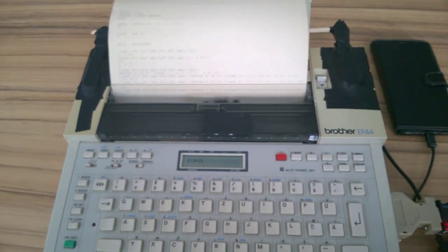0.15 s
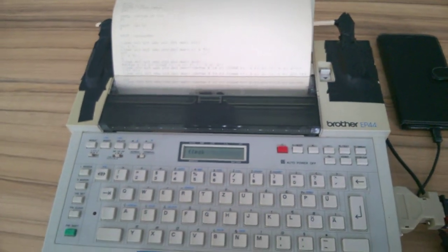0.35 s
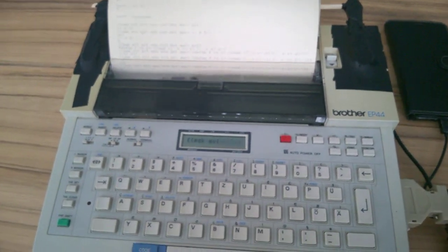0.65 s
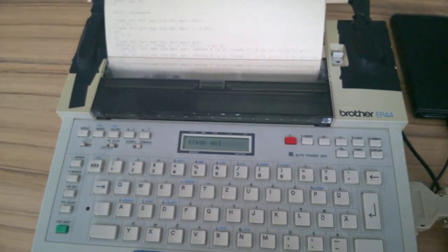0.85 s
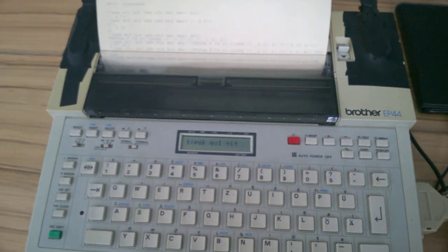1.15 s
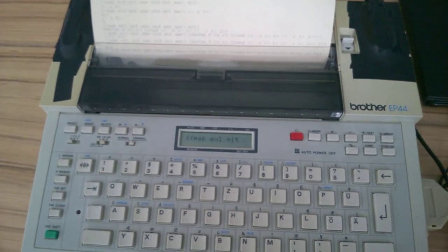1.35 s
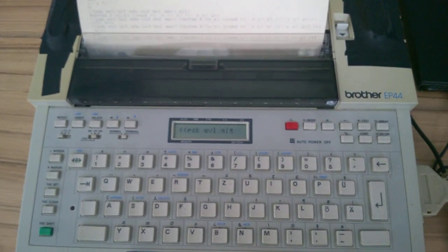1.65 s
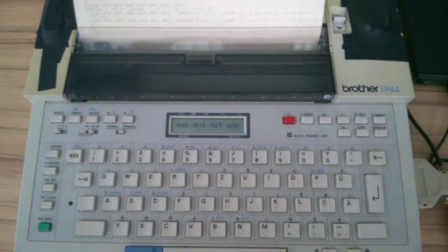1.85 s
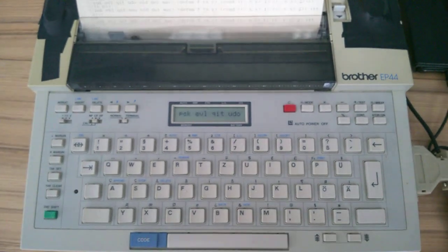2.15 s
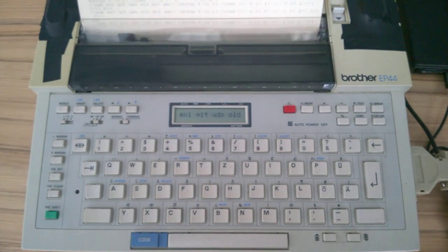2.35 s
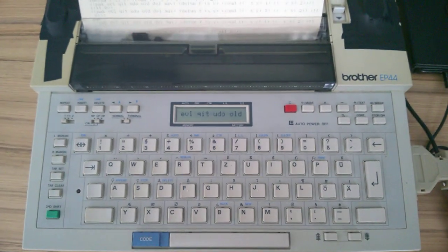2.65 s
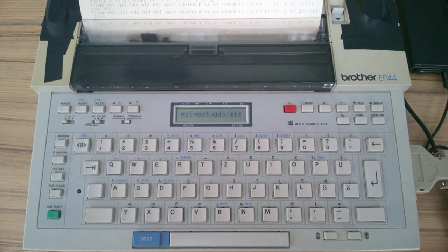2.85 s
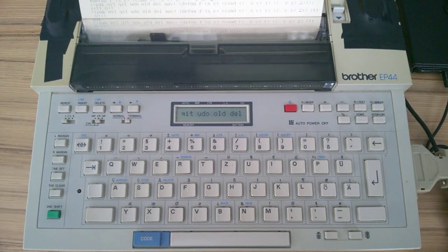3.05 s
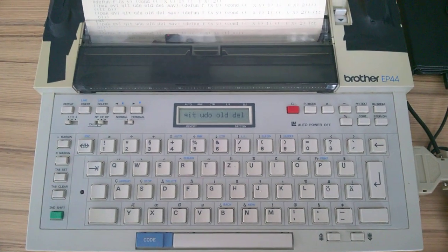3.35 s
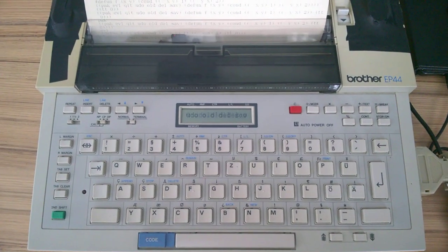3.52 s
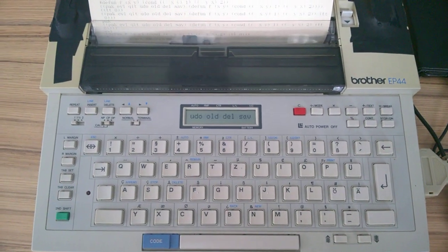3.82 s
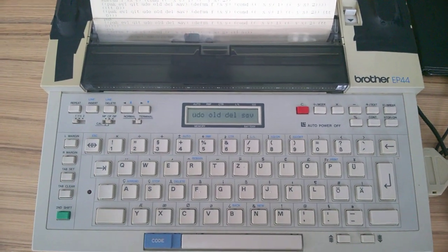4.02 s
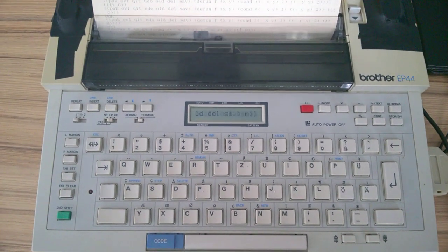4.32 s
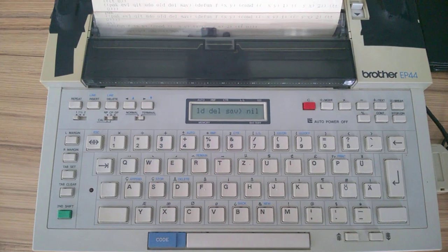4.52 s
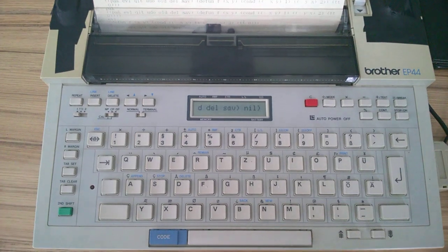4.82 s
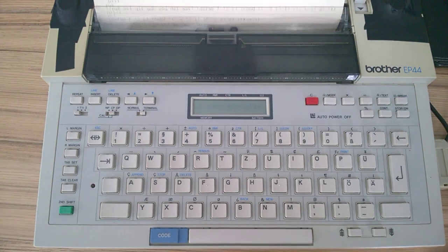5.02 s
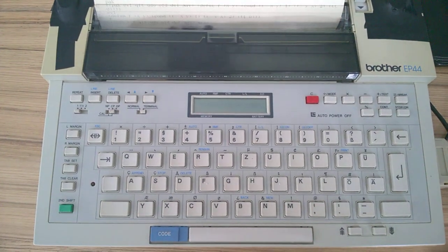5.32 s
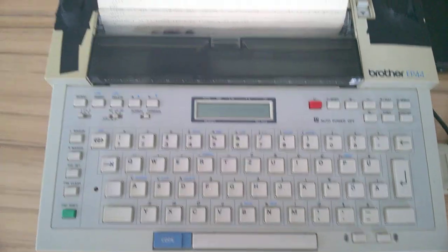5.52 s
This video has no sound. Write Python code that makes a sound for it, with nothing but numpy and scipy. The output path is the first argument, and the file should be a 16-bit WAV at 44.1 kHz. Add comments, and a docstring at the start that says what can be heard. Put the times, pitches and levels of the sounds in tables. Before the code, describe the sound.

Close by, a little printing machine returns with a gear whir, slams and ratchets, then hums and rasps across paper before whirring back.

```python
"""A small electronic typewriter prints by itself on a wooden table, close by: motor and gear lines over chatter.
The carriage whirs back and clacks against its stop, then the paper feeds as filtered, grainy noise.
The head slides along the line, first in one long run, then in short strokes: step-rate chatter makes hum and rub.
Blows are short noise bursts that ring modes of the case. The paper feeds again and the carriage returns.
A small room adds a faint echo over a quiet background noise."""
import sys
import numpy as np
from scipy import signal
from scipy.fft import irfft, next_fast_len
from scipy.io import wavfile
from scipy.ndimage import map_coordinates

SR = 44100
rng = np.random.default_rng(int(sys.argv[2]) if len(sys.argv) > 2 else 0)


def unload_audio(sound):
    """Save the sound as a 16-bit wav file, at the path given as the first command line argument."""
    columns = np.transpose(np.atleast_2d(sound))
    # keep every value between -1 and 1, then stretch to whole-number steps
    steps = np.round(np.clip(columns, -1, 1) * 32767)
    wavfile.write(sys.argv[1], SR, steps.astype(np.int16))


N = 250043
T = np.arange(N) / SR  # time, s
STEP_HZ = 144.2  # nominal step rate of the printing motor


def gain_of(db):
    """Logarithmic level: decibels to an amplitude ratio."""
    return 10 ** (np.asarray(db) / 20)


def evened(x):
    """Normalisation by mean power: scales to rms 1."""
    return x / np.sqrt(np.mean(x ** 2) + 1e-20)


def read(points, hz):
    """Log-frequency interpolation: reads a curve between its points."""
    f, value = np.transpose(points)
    return np.interp(np.log(hz + 1), np.log(f + 1), value)


def add(mix, s, sound):
    """Superposition: mixes a sound in at time s, in place."""
    part = mix[max(round(s * SR), 0):][:len(sound)]
    part += sound[:len(part)]


def gate(start, stop, fade=0.0014):
    """Trapezoidal envelope: 1 from start to stop, with straight fades outside."""
    return np.clip(np.minimum(T - start, stop - T) / fade + 1, 0, 1)


def bell(s, half):
    """Gaussian envelope: a swell around time s that is down to 1/e after half."""
    return np.exp(-((T - s) / half) ** 2)


def swells(rows):
    """Logarithmic modulation: a dB curve of bell-shaped swells and dips."""
    return sum(db * bell(s, half) for s, half, db in rows)


def coloured(x, spectrum, treble_db=0, corner_hz=3600, slope=0.48):
    """Minimum-phase filtering: a causal filter of given spectrum and treble tilt; rms 1."""
    size = next_fast_len(len(x))
    hz = abs(np.fft.fftfreq(size, 1 / SR))
    tilt_db = treble_db * slope * np.log2(1 + (hz / corner_hz) ** 2)
    log_gain = np.log(gain_of(read(spectrum, hz) + tilt_db))
    response = np.exp(np.conj(signal.hilbert(log_gain)))  # the phase follows from the log gain
    return evened(np.fft.ifft(np.fft.fft(x, size) * response).real[:len(x)])


def wander(rate):
    """Low-passed random process: slow chance of rms 1, changing mostly below the given rate in Hz."""
    size = next_fast_len(N, real=True)
    hz = np.fft.rfftfreq(size, 1 / SR)
    hz = hz[hz < 3 * rate]
    bins = rng.standard_normal((len(hz), 2)) @ [1, 1j]
    return evened(irfft(bins * np.exp(-(hz / rate) ** 2), size)[:N])


def chatter(turns, sharp, click=0, uneven_db=0):
    """Periodic impact excitation: one contact a turn, a clean click and noise that flares and dies away."""
    flare = evened(np.exp(-sharp * (turns % 1)) * rng.standard_normal(N))
    clicks = evened(np.diff(np.floor(turns), prepend=0) * rng.uniform(0.5, 1, N))
    boost = np.minimum(rng.exponential(1, N), np.pi)  # capped, so that no contact sticks out too far
    strength = gain_of(uneven_db * boost)[turns.astype(int)]
    return evened((flare + click * clicks) * strength)


def tone(turns, waver):
    """Complex modulation: a rotating part's line whose strength and phase waver as under a varying load."""
    modulation = 1 + waver * (wander(7.3) + 1j * wander(2.3))
    return np.sqrt(2) * (np.exp(2j * np.pi * turns) * modulation).real


# place of the carriage: time_s, share_of_line from the left
CARRIAGE_TRAVEL = [(0, .6), (1.3, 0), (1.8, 0), (4.9, .45), (5.11, .45), (5.67, .2)]


def place():
    """Kinematics: where the carriage is, as a share of the line."""
    return np.interp(T, *np.transpose(CARRIAGE_TRAVEL))


def under_cover(x):
    """Comb filtering: echoes from cover and side walls, whose paths shift as the carriage travels."""
    at = place()
    cover_s = .0004 + .0005 * at
    left_wall_s = .0006 + .0015 * at
    right_wall_s = .0021 - .0015 * at
    echoes = sum(map_coordinates(x, [(T - d) * SR], order=3) for d in (cover_s, left_wall_s, right_wall_s))
    return evened(x + .33 * echoes)


def ring(modes, spread=0):
    """Modal decay: the dying modes of a struck part, each shifted in pitch by up to the spread."""
    t = np.arange(SR // 2) / SR
    detune = 1 + spread * rng.uniform(-1, 1, len(modes))
    phase = rng.random(len(modes))
    out = np.zeros(len(t))
    for (hz, db, t60), d, p in zip(modes, detune, phase):
        out += gain_of(db - 60 * t / t60) * np.sin(2 * np.pi * (hz * d * t + p))
    return (1 - np.exp(-t / 0.00024)) * out


TREBLE_LASTS, BODY_LASTS = .75, 1.25  # factors on the decay time above and below 3 kHz


def burst(decay, rise, size=8192):
    """Frequency-dependent damping: many tiny contacts die away, treble first; with its envelope's rms."""
    t = np.arange(size) / SR
    attack, decay = 1 - np.exp(-t / rise), max(decay, rise)
    body, treble = (signal.sosfilt(signal.butter(2, 3000, side, fs=SR, output="sos"),
                                   rng.standard_normal(size)) for side in ("low", "high"))
    body = body * np.exp(-t / (decay * BODY_LASTS))
    treble = treble * np.exp(-t / (decay * TREBLE_LASTS))
    shape = attack * np.exp(-t / decay)
    return attack * (body + treble), np.sqrt(np.mean(shape ** 2)) / shape.max()


def blows(rows, spectrum, rise=0.0031):
    """Impact radiation: each blow is a noise burst in the colour of the struck part."""
    out = np.zeros(N)
    for s, db, treble_db, decay in rows:
        contacts, rms = burst(decay, rise)
        add(out, s, gain_of(db) * rms * coloured(contacts, spectrum, treble_db))
    return out


def thud(s, half, hz, db):
    """Rigid-body rocking: the whole machine rocks on its feet for a few cycles."""
    t = np.arange(-3 * half, 3 * half, 1 / SR)
    out = np.zeros(N)
    rocking = np.sqrt(2) * np.sin(2 * np.pi * (hz * t + rng.random()))
    add(out, s + t[0], gain_of(db) * np.exp(-(t / half) ** 2) * rocking)
    return out


# the carriage runs back: start_s, stop_s, whir_db, rattle_db (relative, as at the left stop)
CARRIAGE_RETURNS = [(-.01, 1.29, -47, -64), (5.104, 5.7, -46.5, -60)]
# motor and gear lines: pitch_hz, level_db (relative)
MOTOR_LINES = [(209.9, -70), (414.5, -71), (595.5, -59), (624.5, -52.5), (694.4, -64.5), (716.0, -54.5),
               (815, -69.5), (992, -64.5), (1092, -65)]
# spectra of whir, gear rattle and rail: frequency_hz, level_db (relative)
WHIR_SPECTRUM = [(30, -37.5), (330, -26), (480, -17.5), (600, -9), (665, -7.5), (770, -12), (810, -9),
                 (860, -13), (1010, -1.5), (1130, -7), (1270, -20.5), (1410, -9.5), (1620, -22.5),
                 (1780, -17.5), (2050, -22), (3000, -63.5)]
RATTLE_SPECTRUM = [(1500, -8.5), (2400, -9.5), (3000, -2.5), (3900, -2), (4500, -15.5), (5100, -24.5),
                   (6000, -11.5), (7000, -17), (7700, -25.5), (10000, -41.5), (16000, -48.5)]
RAIL_SPECTRUM = [(2000, -28), (2750, -8), (3000, 4.5), (3300, -11), (5000, -57), (5950, -5), (6800, -47)]
# mid-way the rail rings along: middle_s, half_length_s, level_db
RAIL_RINGING = [(0.553, 0.16, -65.5), (0.72, 0.072, -61)]
GEAR_HZ = 99.25  # nominal turns a second
WHIR_DB_PER_LINE, RATTLE_DB_PER_LINE = -3.5, 11  # further right the whir is softer, the rattle louder


def carriage_return(tones_db=-3.0, whir_db=-1.5, steps_db=-4):
    """Gear-mesh excitation: a fast motor's gear knocks once a turn, with four steps a turn, and rings the rail."""
    whir, rattle = np.zeros(N), np.zeros(N)
    for start, stop, run_whir_db, run_rattle_db in CARRIAGE_RETURNS:
        whir += gate(start, stop) * gain_of(run_whir_db + WHIR_DB_PER_LINE * place())
        rattle += gate(start, stop) * gain_of(run_rattle_db + RATTLE_DB_PER_LINE * place())
    ringing = sum(gain_of(db) * bell(s, half) for s, half, db in RAIL_RINGING)
    clock = T + np.cumsum(.002 * wander(5)) / SR  # the speed drifts slightly
    turns = GEAR_HZ * clock
    steps = 4 * turns
    tones = evened(sum(gain_of(db) * tone(hz * clock, waver=.2) for hz, db in MOTOR_LINES))
    knocking = chatter(turns, sharp=1.6, click=0.7) + gain_of(steps_db) * chatter(steps, sharp=2.1)
    body = coloured(knocking, WHIR_SPECTRUM)
    teeth = coloured(chatter(turns, sharp=8, click=.5) + chatter(steps, sharp=1), RATTLE_SPECTRUM)
    teeth = evened(teeth + under_cover(teeth))
    rail = coloured(chatter(turns, sharp=2, click=0.5), RAIL_SPECTRUM)
    motor = whir * (gain_of(tones_db) * tones + gain_of(whir_db) * body)
    return motor + rattle * teeth + ringing * rail


# spectrum of the room's quiet: frequency_hz, level_db (relative)
QUIET_SPECTRUM = [(18, -29), (30, 6.5), (287, -6.5), (384, -19.5), (16000, -23.5)]


def quiet_room(level_db=-80.5):
    """Stationary background noise: the steady, low-weighted quiet of the room."""
    return gain_of(level_db) * coloured(rng.standard_normal(N), QUIET_SPECTRUM)


# the gear sings: middle_s, half_length_s, level_db, initial_sharpness_hz
GEAR_SINGS = [(0.266, 0.058, -49.5, 12.4), (0.486, .045, -52.5, 60), (0.896, 0.032, -51, 27),
              (1.006, .05, -48.5, 17), (1.194, 0.081, -43, 14), (5.235, 0.045, -49, 13.6),
              (5.627, 0.0605, -49, 11.4)]


def singing(waver=0.069, sing_hz=985):
    """Frequency glide: the gear sings in short spells that start sharp and sink to the same pitch."""
    level = sum(gain_of(db) * bell(s, half) for s, half, db, _ in GEAR_SINGS)
    sharp = sum(hz * bell(s - half, half) for s, half, _, hz in GEAR_SINGS)
    return level * tone(np.cumsum(sing_hz + sharp) / SR, waver)


# pawl, ratchet, cam and gears knock: time_s, level_db, treble_db (tilt), decay_s (nominal)
MECHANISM_KNOCKS = [(1.276, -50, -7, 0.014), (1.385, -35.5, -11.5, 0.0028), (1.408, -42.5, -2.5, 0.006),
                    (1.4634, -31.5, -19, 0.005), (1.4695, -22.5, -4.5, 0.0054), (1.476, -23.5, -2.5, .006),
                    (1.4866, -23, 3.5, .0065), (1.5004, -28.5, 1.5, .007), (1.5255, -25, -11, .006),
                    (1.536, -28.5, -16, .0025), (1.626, -35, -23, 0.011), (1.644, -33.5, -11, 0.015),
                    (1.802, -34, -5, 0.0029), (1.8195, -42.5, 5.5, 0.0021), (2.209, -58, -5, 0.0068),
                    (4.922, -35.5, -7, 0.0058), (4.926, -21, -5.5, .016), (4.9412, -20, -0.5, 0.0055),
                    (4.9572, -30.5, 6.5, .0045), (4.968, -27.5, -2.5, 0.0064), (4.9828, -25.5, -9, 0.007),
                    (5.095, -37, -8.5, 0.0069)]
# spectrum of the knocks: frequency_hz, level_db (relative)
KNOCK_SPECTRUM = [(40, -22), (130, -9), (250, 2), (370, -12.5), (620, 1.5), (850, 3.5), (1250, -6.5),
                  (1600, -7.5), (1950, -1), (2400, -11), (4200, -4), (8000, -10), (11000, -19),
                  (14000, -24), (16000, -30.5)]


def knocks():
    """Impulsive contact: pawl, ratchet, cam and gears strike with a fast rise."""
    return blows(MECHANISM_KNOCKS, KNOCK_SPECTRUM, rise=.0007)


# modes of the plastic case: pitch_hz, level_db (relative), t60_s
CASE_MODES = [(74, -14, .12), (215, -16, .1), (275, -14, .1), (485, -12, .12), (635, -6, .08),
              (774, -2, .085), (908, -4, .09), (1070, -6, .08), (1447, -8, .09), (1625, -7, .09),
              (1886, 1, .075), (4490, -10, .06)]
# modes of the pawl spring: pitch_hz, level_db (relative), t60_s
SPRING_MODES = [(3394, 7, 0.069), (11530, 1, 0.065)]


def case_ring(ring_db=-14, spring_db=-36):
    """Modal excitation: every knock and slam rings the case, its modes shifting a little; the spring pings once."""
    out = np.zeros(N)
    for s, db, *_ in slam_rows() + MECHANISM_KNOCKS:
        add(out, s, gain_of(db + ring_db) * ring(CASE_MODES, spread=.012))
    add(out, 1.502, gain_of(spring_db) * ring(SPRING_MODES))
    return out


# the machine thuds on the table after heavier blows: middle_s, half_length_s, pitch_hz, level_db
TABLE_THUDS = [(1.328, 0.015, 133.2, -39), (1.413, .014, 136.2, -43), (1.476, 0.012, 201.5, -37.5),
               (1.535, .02, 135, -40.5), (1.746, 0.016, 143.7, -36), (4.94, .018, 200.1, -41.5),
               (4.997, 0.024, 130, -45)]


def table_thuds():
    """Low-frequency body motion: the machine rocks briefly on the table."""
    return sum(thud(*row) for row in TABLE_THUDS)


# the head latch slams open at the end stop, and shut before printing: time_s, level_db (relative)
LATCH_SLAMS = [(1.3026, -12.5), (1.721, -12)]
# run-up, first touch and blow of each slam: delay_s, level_db (relative), treble_db (tilt), decay_s (nominal)
SLAM_PARTS = [(-.014, -17.5, -14.5, .012), (-.003, -8, -2, .0055), (0.0005, -3.5, 2.5, .0036)]


def slam_rows():
    """Successive impacts: each slam's parts as time_s, level_db, treble_db, decay_s."""
    return [(s + delay, db + part_db, treble_db, decay)
            for s, db in LATCH_SLAMS for delay, part_db, treble_db, decay in SLAM_PARTS]


# spectrum of the hard latch: frequency_hz, level_db (relative)
SLAM_SPECTRUM = [(40, -11.5), (450, -6.5), (790, 5), (1200, -9.5), (1900, 3.5), (2300, -7), (2800, -2.5),
                 (5400, -3), (6700, 3), (10300, -5.5), (12500, -3.5), (16000, -11.5)]


def latch_slams():
    """Hard-body impact: the latch touches, then strikes."""
    return blows(slam_rows(), SLAM_SPECTRUM)


# line feeds: start_s, length_s, level_db (relative)
LINE_FEEDS = [(1.463, 0.15, -22.5), (4.938, 0.14, -21.5)]
# mechanism and paper slide softly: start_s, stop_s, level_db, fade_s
SOFT_SLIDES = [(1.312, 1.806, -54.5, 0.052), (1.8, 2.516, -71, 0.062)]
# spectrum of the sliding: frequency_hz, level_db (relative)
FEED_SPECTRUM = [(40, -10), (256, -7.5), (345, -8), (810, -2), (918, -8), (2260, -19), (4800, -17.5),
                 (9220, -20), (12500, -29), (16000, -50.5)]
PAPER_DB = -24.5  # the paper sliding, relative to its feed
SHAKE_DB, SHAKE_FALL_DB_PER_S = -18.5, 290.5  # shiver of loose parts, relative to the slam


def paper_feed(grain_db=2.5, fade=0.029):
    """Friction noise: paper hisses round the platen, the mechanism slides, loose parts shiver after each slam."""
    paper = sum(gain_of(db + PAPER_DB) * gate(s + fade, s + length, fade) for s, length, db in LINE_FEEDS)
    slides = sum(gain_of(db) * gate(start + ease, stop, ease) for start, stop, db, ease in SOFT_SLIDES)
    shiver = sum((T > s) * gain_of(db + SHAKE_DB - SHAKE_FALL_DB_PER_S * abs(T - s)) for s, db in LATCH_SLAMS)
    level = np.sqrt(paper ** 2 + slides ** 2 + shiver ** 2)  # the powers add
    grainy = rng.standard_normal(N) * gain_of(grain_db * wander(200))
    return level * coloured(grainy, FEED_SPECTRUM)


# strokes of the head: start_s, stop_s, jolt_db (relative), treble_db (tilt of the jolt), rest_db (relative)
HEAD_STROKES = [(1.811, 3.361, -40.5, 7, -47.5), (3.44, 3.704, -35.5, 1.5, -52),
                (4.042, 4.119, -36, 13.5, -53), (4.245, 4.511, -36, 12, -50.5),
                (4.644, 4.714, -35, 15, -47), (4.842, 4.919, -34.5, 13.5, -56.5)]
# spectrum of the carriage jerking into motion: frequency_hz, level_db (relative)
JOLT_SPECTRUM = [(40, -12), (95, -5.5), (140, 11), (200, 4.5), (370, -8), (580, -1), (1000, -2.5),
                 (1300, -13.5), (2400, -18.5), (3700, -14), (16000, -56)]
# modes of the carriage frame: pitch_hz, level_db (relative), t60_s
FRAME_MODES = [(153.7, -11, 0.5), (284.5, -8, 0.57), (577, -13, 0.34)]


def starts_and_stops(slack_db=-7, press_delay=.017, settle_db=-3, bump_db=-3, bump_decay=0.0085,
                     halt_db=-54, halt_hz=258, halt_half=0.0114):
    """Transient inertia: a stroke takes up slack, presses the head on, bumps to rest and rings the frame."""
    slack = [(s + 0.0035, db + slack_db, treble_db, .012) for s, _, db, treble_db, _ in HEAD_STROKES]
    press = [(s + press_delay, db, treble_db, .012) for s, _, db, treble_db, _ in HEAD_STROKES]
    bumps = [(stop, db + bump_db, 0, bump_decay) for _, stop, _, _, db in HEAD_STROKES]
    out = sum(blows(rows, JOLT_SPECTRUM) for rows in (slack, press, bumps))
    for _, stop, _, _, db in HEAD_STROKES:
        add(out, stop, gain_of(db + settle_db) * ring(FRAME_MODES))
        out += thud(stop + halt_half, halt_half, halt_hz, halt_db)
    return out


# hum of the stepper: multiple_of_step_rate, level_db (relative)
HUM_ORDERS = [(1, -16), (3, -25.5), (5, -19.5), (6, -17.5), (8, -31.5), (10, -32)]
# spectra of the drive and of the head rubbing: frequency_hz, level_db (relative)
DRIVE_SPECTRUM = [(30, -1), (100, -6), (200, -8.5), (255, 2.5), (335, -6.5), (480, -4.5), (620, 11.5),
                  (700, -3), (830, 4), (910, -5.5), (1000, 6.5), (1200, -12), (1600, -15), (1950, -33.5),
                  (3000, -42)]
RUB_SPECTRUM = [(1200, -29.5), (2400, -9), (3000, 8), (3500, -0.5), (4100, 4), (4800, -12), (5800, 2),
                (7300, -8), (16000, -50)]
# the head skims the paper more lightly: middle_s, half_length_s, change_db
LIGHT_SKIMS = [(2.185, 0.035, -26), (2.3, 0.026, -8), (2.635, 0.018, -12.5), (2.815, 0.017, -7.5),
               (2.935, 0.015, -10)]
# the head presses harder on the paper: middle_s, half_length_s, change_db
HARD_PRESSES = [(2.57, 0.053, 3.5), (3.53, 0.096, 6.5)]
# the carriage binds on its rail, groans and whines: middle_s, half_length_s, change_db (over free running)
RAIL_BINDS = [(2.39, 0.033, 7.5), (2.46, 0.031, 15)]
# drone of the frame at twice the step rate: time_s, level_db
FRAME_DRONE = [(1.9, -60.5), (2.03, -70), (2.26, -57), (3.45, -61), (4.1, -70.5)]
DRONE_LINGER_S = .04
RUB_DB, RUB_DB_PER_LINE, RUB_WAVER_DB = -70, 34.5, 2.5  # the head rubs harder as it travels right


def printing(hum_db=-52, whine_db=-62.5, drive_db=-54, groan_db=-67, rub_db=-1, fizz_db=-23, coast=0.014):
    """Stick-slip and forced vibration: the stepper hums, drones the frame and drags the head in uneven jerks."""
    sliding = sum(gate(start + 0.0027, stop, fade=0.0027) for start, stop, *_ in HEAD_STROKES)
    turning = sum(gate(start + coast, stop, fade=coast) for start, stop, *_ in HEAD_STROKES)
    pressure_db = swells(LIGHT_SKIMS) + swells(HARD_PRESSES) + RUB_WAVER_DB * wander(3.7)
    rub = gain_of(RUB_DB + RUB_DB_PER_LINE * place() + pressure_db)
    bind = gain_of(swells(RAIL_BINDS) + swells(LIGHT_SKIMS))
    turns = STEP_HZ * np.cumsum(1 + 0.0017 * wander(3.82)) / SR  # one turn is one step

    hum = sum(gain_of(db) * tone(k * turns, waver=1.0) for k, db in HUM_ORDERS)
    whine = tone(4 * turns, waver=.3)
    body = coloured(chatter(turns, sharp=0.51), DRIVE_SPECTRUM)
    motor = gain_of(hum_db) * hum + gain_of(whine_db) * bind * whine + gain_of(drive_db) * body

    keep = np.exp(-1 / (DRONE_LINGER_S * SR))
    drive_level = turning * gain_of(np.interp(T, *np.transpose(FRAME_DRONE)))
    drone = signal.lfilter([1 - keep], [1, -keep], drive_level) * tone(2 * turns, waver=0.24)

    groan_spectrum = [(900, -28.5), (1900, 1), (2600, -18), (4000, -3.5), (10000, -34)]
    fizz_spectrum = [(4000, -43), (7500, 19), (11000, 2), (16000, -15)]
    groan = coloured(chatter(turns, sharp=0.59), groan_spectrum)
    grains = evened(chatter(turns, sharp=.5) + .8 * chatter(turns, sharp=4, uneven_db=5.5))
    scratch = under_cover(coloured(grains, RUB_SPECTRUM))
    fizz = coloured(grains, fizz_spectrum)
    head = rub * (gain_of(rub_db) * scratch + gain_of(fizz_db) * fizz)
    head += gain_of(groan_db) * np.minimum(bind, np.pi) * groan  # the groan saturates
    return turning * motor + drone + sliding * head


# the head catches on the paper: start_s, length_s, level_db
PAPER_CATCHES = [(1.959, 0.019, -61.5), (2.034, 0.0088, -52.5), (2.357, .011, -56), (2.459, 0.0051, -59),
                 (2.484, 0.022, -59.5), (2.702, 0.095, -61), (2.753, 0.0095, -55), (3.109, 0.061, -57),
                 (3.233, .02, -58), (3.591, 0.048, -54), (4.454, .054, -61.5)]
# spectrum of the scratch: frequency_hz, level_db (relative)
SCRATCH_SPECTRUM = [(1500, -31), (3000, 1), (4100, 5), (5000, -5.5), (7700, 0), (10000, -16.5),
                    (16000, -43)]


def scrapes(fade=0.0026):
    """Intermittent friction: where the head catches, it scratches brightly, one tick to each step."""
    catching = sum(gain_of(db) * gate(s + fade, s + length - fade, fade) for s, length, db in PAPER_CATCHES)
    return catching * coloured(chatter(STEP_HZ * T, sharp=1.2, uneven_db=3), SCRATCH_SPECTRUM)


# reverberation time of the room: frequency_hz, t60_s
ROOM_DECAY = [(100, .2), (300, .25), (1200, .15), (3000, .094), (16000, .04)]


def room(x, delay=0.0052):
    """Reverberation: convolution with decaying noise whose bass outlasts its treble."""
    hz, t, z = signal.stft(rng.standard_normal(SR * 3 // 4), SR, nperseg=256)
    decay = gain_of(-60 * t / read(ROOM_DECAY, hz)[:, None])
    tail = signal.istft(z * decay, SR, nperseg=256)[1]
    tail *= np.minimum(np.arange(len(tail)) / SR / delay, 1)  # the echo builds up
    return signal.fftconvolve(x, tail / np.linalg.norm(tail))[:N]


def scene(jolt_db=-3.5, motor_room_db=-18, clack_room_db=-14):
    """Superposition of direct and reverberant sound: motor, paper and blows in a quiet room."""
    running = carriage_return() + singing() + paper_feed() + printing() + scrapes()
    running += gain_of(jolt_db) * starts_and_stops()
    clacks = knocks() + case_ring() + table_thuds() + latch_slams()
    echo = room(gain_of(motor_room_db) * running + gain_of(clack_room_db) * clacks)
    return (running + clacks + echo + quiet_room())[None]


def record(dry, edge_hz=15900):
    """Band limitation: a linear-phase low-pass removes the highest treble."""
    low_pass = signal.firwin(511, edge_hz, window=("kaiser", 9), fs=SR)
    return signal.oaconvolve(dry, low_pass[None], "same")


dry = scene()
out = record(dry)
unload_audio(out)
```